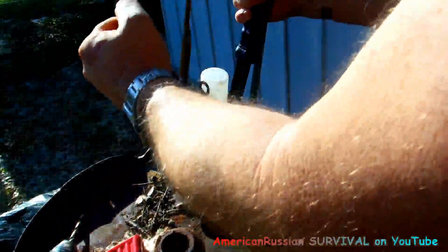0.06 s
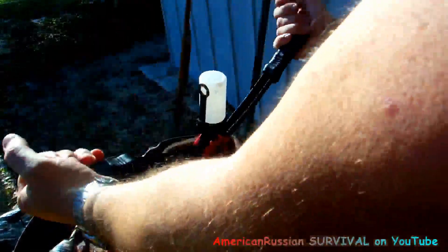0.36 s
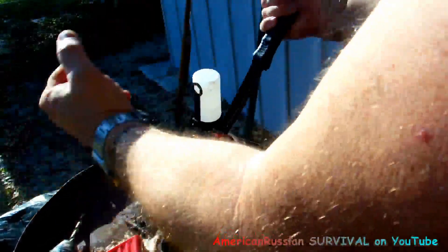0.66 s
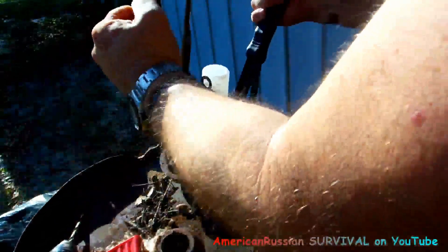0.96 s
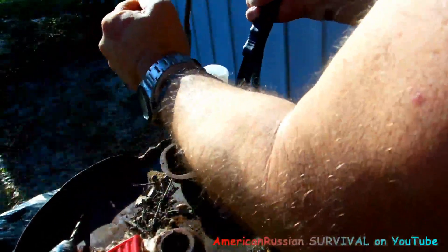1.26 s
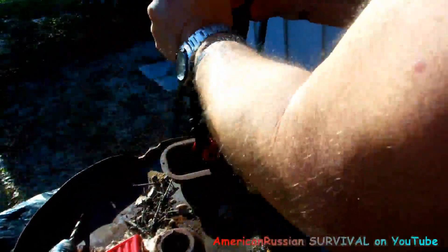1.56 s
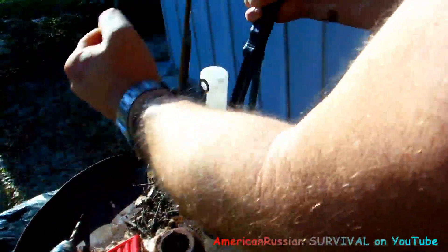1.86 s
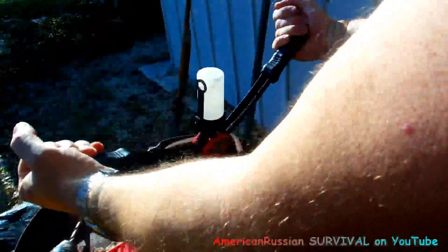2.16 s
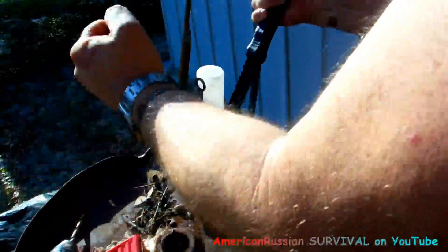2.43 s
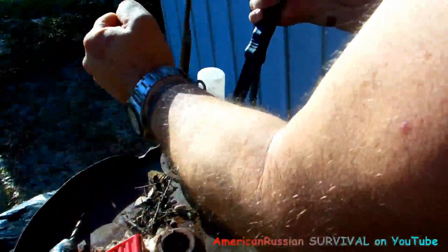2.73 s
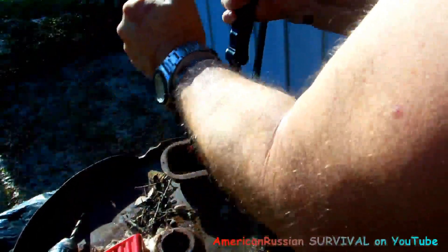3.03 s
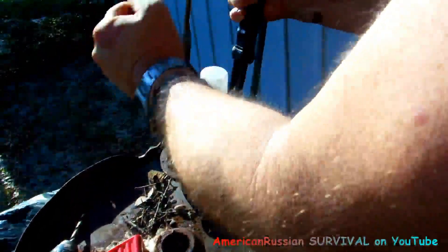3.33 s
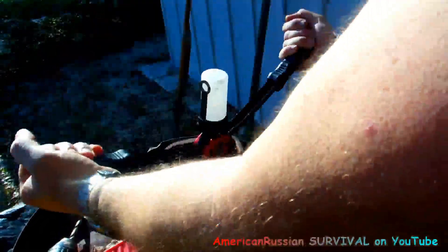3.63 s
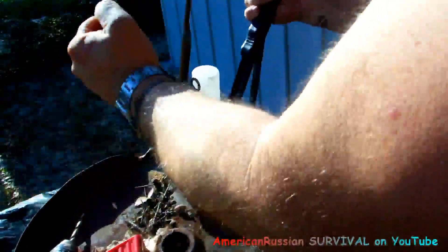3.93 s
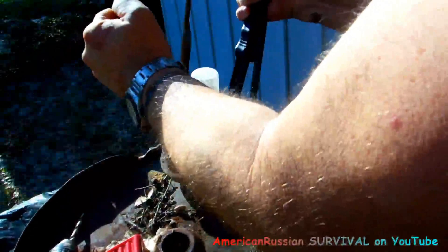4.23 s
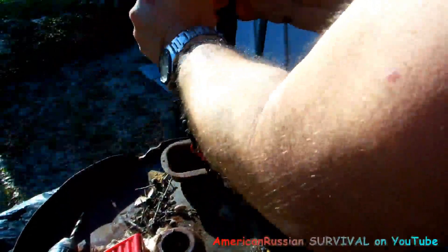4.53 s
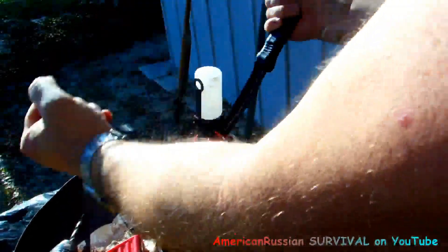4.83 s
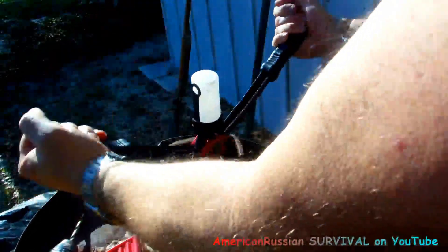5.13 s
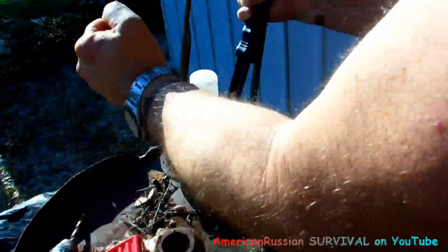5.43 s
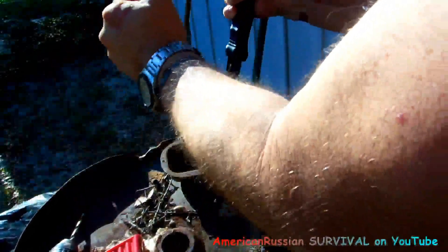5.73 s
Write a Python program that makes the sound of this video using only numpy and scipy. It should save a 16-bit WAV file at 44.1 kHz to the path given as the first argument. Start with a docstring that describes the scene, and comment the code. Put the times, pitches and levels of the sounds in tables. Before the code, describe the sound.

A long-handled steel rivet tool is pumped four times outdoors, close to the microphone and a touch left of centre. Each pull ends in a loud, hard snap, at about 0.4, 2.1, 3.7 and 5.0 seconds, which briefly overloads the microphone and leaves a very short metallic ring. Between the snaps the pivots give quieter, irregular ticks, hollow clacks and dull knocks, and a faint hissing rub swells with each stroke. The jaws chink brightly as the handles turn round, most clearly at 1.7 and 3.3 seconds, more softly at 2.7, 4.1 and 4.7. The metal sounds have a slight, short echo from the yard. Wind buffets the microphone with a low, uneven rumble and soft thumps, leaning to the right, strongest around 3 seconds and easing after 5. A soft, distant outdoor rush lies underneath and sinks toward the end, just before 6 seconds.

```python
"""Steel rivet tool in the wind

A long-handled rivet tool is pumped four times, close by and outdoors. Each pull ends in a snap
that shakes the frame and overloads the microphone; in between the linkage clacks, the jaws chink
and the slide rubs. Wind buffets the two microphone ports over a distant rush."""
import sys
import numpy as np
from scipy import signal
from scipy.fft import rfft, irfft, next_fast_len
from scipy.io import wavfile
from scipy.ndimage import uniform_filter1d, map_coordinates

SR = 44100
rng = np.random.default_rng(int(sys.argv[2]) if len(sys.argv) > 2 else 0)


def transcribe(u):
    """Save the signal u as a 16-bit wav file named by the first command-line argument.

    u: samples, shape (n,) or (channels, n), limited to [-1, 1]; the rate is SR.
    q: integer samples, one column per channel.
    """
    v = np.clip(np.atleast_2d(u).T, -1, 1)
    q = np.round(v * 32767).astype(np.int16)
    wavfile.write(sys.argv[1], SR, q)


N = 254898

# the jaws let go: time_s, crack_db, ring_db, strongest_resonance_hz, lift_db, jolt_lead_s, jolt_db
SNAPS = [(0.3762, -1, -2, 1490, 6.5, 0.0034, -13), (2.109, -3.5, -1, 5240, 3.5, 0.0064, -15),
         (3.655, -3, -3.5, 2160, 10.5, 0.0012, -7), (5.023, -4.5, -4.5, 3800, 6.5, .0027, -15.5)]
# bright tick of steel on steel: freq_hz, level_db
TICK_COLOUR = [(2500, -51), (5000, -7.5), (7200, 1), (8600, -2), (13500, -6.5), (16000, -6.5)]
# hollow clack of the same contact: freq_hz, level_db
CLACK_COLOUR = [(700, -42), (1500, -2.5), (2100, -4.5), (2600, -5), (3400, -1.5), (4400, -7), (6500, -16)]


def amp(db):
    """Decibels to gain."""
    return 10 ** (np.asarray(db) / 20)


def unit(x):
    """Scaled to rms 1."""
    return x / np.sqrt(np.mean(x ** 2) + 1e-20)


def along(points, hz):
    """A (freq_hz, value) curve read on a log frequency axis."""
    freqs, values = np.transpose(points)
    return np.interp(np.log(hz + 1), np.log(freqs + 1), values)


def curves(rows):
    """One value per sample for each column after the time."""
    times, *columns = np.transpose(rows)
    return [np.interp(np.arange(N) / SR, times, column) for column in columns]


def wobble(rate_hz):
    """A smooth random curve through rate_hz knots a second."""
    knots = rng.standard_normal(int(N * rate_hz / SR) + 4)
    return map_coordinates(knots, [np.arange(N) * rate_hz / SR])


def filtered(x, response):
    """x shaped by a gain that depends on frequency."""
    n = x.shape[-1]
    padded = next_fast_len(n + SR // 20)
    return irfft(rfft(x, padded) * response(np.fft.rfftfreq(padded, 1 / SR)), padded)[..., :n]


def noise(gain, size, likeness=None):
    """Stereo noise of rms 1 with a given colour and likeness between the ports."""
    # by default the stereo image widens toward the treble: freq_hz, correlation
    default_likeness = [(400, 1), (2000, 0.93), (4000, 0.57), (13000, 0.23)]

    def mid_side(hz):
        angle = np.arccos(np.clip(along(likeness or default_likeness, hz), -1, 1)) / 2
        return gain(hz) * np.array([np.cos(angle), np.sin(angle)])
    mid, side = filtered(rng.standard_normal((2, size)), mid_side)
    return unit(np.array([mid + side, mid - side]))


def colour(points):
    """Gain as a function of frequency from (freq_hz, level_db) points."""
    return lambda hz: amp(along(points, hz))


def struck(points, ripple_db, step_hz):
    """A colour whose resonances are excited anew, stronger here and weaker there."""
    knots = rng.standard_normal(128)
    ripple = lambda hz: map_coordinates(knots, [hz / step_hz], mode="mirror")
    return lambda hz: amp(along(points, hz) + ripple_db * ripple(hz))


def fade(t, t60_s):
    """Exponential decay, 60 dB in t60_s."""
    return np.exp(-np.log(1000) * t / np.maximum(t60_s, 1e-3))


def rise(t, attack_s):
    """A soft start."""
    return 1 - np.exp(-(t / attack_s) ** 2)


def pan(left_lead_db):
    """Left and right gains of mean power 1."""
    gains = amp(np.array([left_lead_db, -left_lead_db]) / 2)
    return gains / np.sqrt(np.mean(gains ** 2, axis=0))


def add(track, start_s, sound):
    """Mix a sound into the track."""
    part = track[:, max(round(start_s * SR), 0):][:, :sound.shape[-1]]
    part += sound[..., :part.shape[1]]


def snaps():
    """A hard crack as the load lets go, then the frame shudders and rings."""
    # colour of the crack and its shudder: freq_hz, level_db
    crack_colour = [(50, -26), (170, -2.5), (320, -20), (450, -12), (1000, -9.5), (1700, -13),
                    (2650, -13.5), (4000, -12.5), (9500, -13), (12000, -14), (15000, -19)]
    # decay of the shudder: freq_hz, t60_s
    shudder_decay = [(1000, 0.19), (5000, 0.12), (14000, 0.069)]
    out, t = np.zeros((2, N)), np.arange(SR * 2 // 5) / SR
    for start_s, crack_db, ring_db, peak_hz, lift_db, *_ in SNAPS:
        lift = lambda hz: amp(lift_db * np.exp(-(np.log((hz + 1) / peak_hz) / 0.13) ** 2))
        modes = struck(crack_colour, ripple_db=1.3, step_hz=261.0)
        tone = lambda hz: modes(hz) * lift(hz)
        # the first contact is hard and carries little bass
        crack = noise(lambda hz: tone(hz) * hz / (hz + 700), len(t)) * rise(t, 0.0019) * fade(t, 0.038)
        # countless dense modes, the high ones dying first
        band_hz, times, bands = signal.stft(noise(tone, len(t)), SR, nperseg=128)
        bands *= fade(times, along(shudder_decay, band_hz)[:, None])
        shudder = signal.istft(bands, nperseg=128)[1][:, :len(t)] * rise(t, 0.00083)
        add(out, start_s, amp(crack_db) * (amp(9.5) * crack + amp(-0.5) * shudder))
        # the heavy frame takes some milliseconds to swing up
        ring = frame_ring(t, lift, scatter_db=3, spread=0.62) * rise(t, 0.0043)
        add(out, start_s, amp(ring_db + 1) * ring)
    return out


def frame_ring(t, lift, scatter_db, spread):
    """The frame's modes at new strengths and phases; higher ones reach the two ports less alike."""
    # modes of the frame and handles: pitch_hz, level_db, t60_s
    modes = [(246.3, -13, 0.16), (388.5, -3.5, 0.14), (414.4, -2, 0.14), (472.3, -6, 0.14),
             (588.5, -12.5, 0.22), (804, -9.5, 0.19), (864, -26, 0.15), (949, -3.5, 0.067),
             (1564, -5, 0.067), (1835, -7, 0.092), (2430, -13, 0.087), (3470, -13, 0.11), (4770, -20, 0.19),
             (10690, -24, 0.052)]
    hz, level_db, t60_s = np.transpose(modes)[:, :, None]
    strength, skew = rng.standard_normal((2, len(modes), 1))
    start_phase = rng.uniform(0, 2 * np.pi, (len(modes), 1))
    # rattling joints make each mode's phase drift
    drift = 11 * np.cumsum(rng.standard_normal((len(modes), len(t))), axis=1) / np.sqrt(SR)
    phase = 2 * np.pi * hz * t + start_phase + drift
    port_shift = spread * skew * np.sqrt(hz / SR)
    envelope = amp(level_db + scatter_db * strength) * lift(hz) * fade(t, t60_s)
    return np.array([np.sum(envelope * np.sin(phase + side * port_shift), axis=0) for side in (1, -1)])


def linkage():
    """The pivots take up their play along each stroke, and jolt just before each snap."""
    # pivot contacts: start_s, tick_db, clack_db, knock_db, scrape_s
    contacts = [(0.129, -18.5, -25, -33.5, 0.0036), (0.181, -28, -34.5, -39, 0.012),
                (0.702, -36.5, -37, -45, 0), (0.741, -38.5, -37.5, -40.5, 0.016),
                (0.84, -25, -36, -41, 0.0014), (0.867, -27.5, -32.5, -27, 0),
                (0.916, -32, -39, -39, 0.0053), (1.044, -57, -43, -33, 0.0081),
                (1.640, -52, -34.5, -23, 0.0052), (1.654, -21, -23, -39, 0.00029),
                (1.942, -47, -25.5, -30, 0.0017), (2.429, -35, -36, -53, 0.0047),
                (2.445, -42, -34.5, -36.5, 0.017), (2.561, -27, -25.5, -33, 0), (2.583, -26.5, -42, -35, 0),
                (3.249, -33, -30, -31, 0.029), (3.262, -35, -19, -23.5, 0), (3.51, -36, -35.5, -35, 0.018),
                (3.772, -30.5, -31, -32, 0.0042), (3.942, -38, -30, -32, 0.00089),
                (4.058, -28.5, -28, -33.5, 0), (4.591, -29.5, -36.5, -35.5, 0.01),
                (4.612, -19.5, -23, -26.5, 0.00032), (4.881, -43.5, -41.5, -39, 0.023),
                (4.969, -41, -28.5, -33, 0), (5.123, -37.5, -35, -39, 0.0023),
                (5.308, -48, -39, -41.5, 0.018), (5.433, -25, -29.5, -31, 0),
                (5.461, -38, -43.5, -43, 0.016), (5.515, -34.5, -44.5, -52, 0.012)]
    out, t = np.zeros((2, N)), np.arange(SR // 5) / SR
    for start_s, *hit in contacts:
        add(out, start_s, pivot_contact(t, *hit))
    for snap_s, *_, lead_s, jolt_db in SNAPS:
        jolt = pivot_contact(t, tick_db=jolt_db - 3, clack_db=jolt_db, knock_db=jolt_db - 11.5)
        add(out, snap_s - lead_s, jolt * rise(t, 0.00068))
    return out


def pivot_contact(t, tick_db, clack_db, knock_db, scrape_s=0):
    """A pivot hits home: a bright tick, a hollow clack and a slower knock in the handles."""
    # dull body of the handles: freq_hz, level_db
    knock_colour = [(150, -8), (300, -3.5), (480, 2), (700, -7.5), (1500, -9.5), (2800, -27.5)]
    # a scraping contact keeps up an uneven level until it comes free
    free_s = np.maximum(t - scrape_s, 0)
    grit_db = 1.5 * unit(uniform_filter1d(rng.standard_normal(len(t)), size=80)) * (t < scrape_s)
    burst = amp(grit_db) * (fade(free_s, 0.026) + amp(-11) * fade(free_s, 0.085))
    spike = 0.8 * fade(t, 0.0025)
    tick = noise(struck(TICK_COLOUR, ripple_db=2, step_hz=545), len(t)) * (burst + spike)
    clack = noise(struck(CLACK_COLOUR, ripple_db=1, step_hz=339), len(t)) * burst
    knock = noise(colour(knock_colour), len(t)) * rise(t, 0.0007) * fade(free_s, 0.17)
    return amp(tick_db + 2.5) * tick + amp(clack_db + 4) * clack + amp(knock_db + 3.5) * knock


def jaws():
    """Small hard parts skid for a few milliseconds and ring high: a touch, the chink, a rebound."""
    # the jaws and their spring chink as the handles turn round: time_s, level_db
    chinks = [(1.6874, -8), (2.657, -15.5), (3.301, -4.5), (4.146, -13.5), (4.661, -15.5), (5.595, -30)]
    # resonances of the jaws: pitch_hz, width_hz, level_db
    resonances = [(6450, 3000, -6.5), (7320, 290, 5.5), (9700, 1500, -2.5), (11400, 500, 2),
                  (12700, 1500, 1.5)]
    skid_s, skid_db = 0.0102, -8
    out, t = np.zeros((2, N)), np.arange(SR // 10) / SR

    def steel(hz):
        return abs(sum((-1) ** k * amp(db) * 1j * hz * width / (pitch ** 2 - hz ** 2 + 1j * hz * width)
                       for k, (pitch, width, db) in enumerate(resonances)))
    for time_s, level_db in chinks:
        for step in (-1, 0, 1):
            chink = noise(steel, len(t)) * rise(t, 0.0013) * fade(t, 0.027)
            add(out, time_s + step * skid_s, amp(level_db + abs(step) * skid_db) * chink)
    return out


def slide_speed(offset_s, width_s):
    """A swell from 0 to 1 and back in every stroke, centred offset_s after its snap."""
    t = np.arange(N) / SR
    return sum(np.exp(-((t - snap_s - offset_s) / width_s) ** 2) for snap_s, *_ in SNAPS)


def slide_rub():
    """A fine hiss with a faint whistle, swelling and catching as the slide rubs to and fro."""
    # hiss with a narrow whistling peak: freq_hz, level_db
    hiss_colour = [(2000, 9), (3500, 1.5), (5500, -1), (7250, -1), (7500, 2), (7750, -3.5), (10000, -0.5),
                   (14000, 0)]
    rest_db, stroke_db, catches_per_s = -45.5, -42.5, 49
    motion = slide_speed(offset_s=-0.15, width_s=0.256) + slide_speed(offset_s=0.49, width_s=0.12)
    rub = np.sqrt(amp(rest_db) ** 2 + motion * amp(stroke_db) ** 2)
    hiss = amp(wobble(230)) * noise(colour(hiss_colour), N)
    # the surfaces catch only while the slide moves, each catch dying within milliseconds
    impulses = (rng.random(N) < catches_per_s * motion / SR) * rng.random(N) ** 2
    envelope = signal.fftconvolve(impulses, fade(np.arange(SR // 20) / SR, 0.013))[:N]
    catches = envelope * noise(lambda hz: colour(TICK_COLOUR)(hz) + colour(CLACK_COLOUR)(hz), N)
    return rub * (hiss + amp(12.5) * catches)


def yard_echo(x):
    """A short answer from the ground and a nearby wall."""
    t = np.arange(SR // 3) / SR
    tail = rng.standard_normal((2, len(t))) * rise(t, 0.00075) * fade(t, 0.3)
    return signal.fftconvolve(x, tail / np.linalg.norm(tail[0]), axes=1)[:, :N]


def wind():
    """Buffeting on the ports; fast eddies arrive as single short thumps that reach higher."""
    # the gusts: time_s, buffet_db, eddy_db
    gusts = [(0.0, -27, -41), (0.17, -28.5, -34.5), (0.3, -17.5, -29.5), (0.55, -19.5, -32),
             (1.3, -20.5, -33), (1.95, -22, -35), (2.35, -31, -57), (2.6, -22.5, -35.5), (2.95, -13.5, -22),
             (3.2, -20.5, -26.5), (3.6, -17.5, -27.5), (3.8, -17.5, -35.5), (4.05, -23.5, -30),
             (4.3, -24, -75), (4.5, -23, -43.5), (4.75, -29.5, -52), (5.1, -36.5, -49), (5.78, -36, -48.5)]
    # deep buffeting: freq_hz, level_db
    rumble_colour = [(8, -29), (20, 1), (50, -2.5), (120, -9.5), (200, -32.5), (500, -75)]
    # fast eddies: freq_hz, level_db
    eddy_colour = [(50, -5), (130, 3.5), (200, 1), (330, -10), (600, -26), (1500, -50.5)]
    buffet_db, eddy_db = curves(gusts)
    rumble = amp(buffet_db) * noise(colour(rumble_colour), N, likeness=[(50, 0.44)])
    rumble *= unit(amp(wobble(14)))
    # each thump lasts about one cycle and is felt a little differently at each port
    thumps = unit(amp(4.2 * wobble(75) + 2 * np.array([wobble(75), wobble(75)])))
    eddies = amp(eddy_db + 3.5) * noise(colour(eddy_colour), N, likeness=[(150, 0.81)]) * thumps
    # gusts lean to the windward right port, small fast eddies more so than big slow ones
    calm_db = -31
    lean_db = -0.96 * np.maximum(buffet_db - calm_db, 0)
    return pan(0.76 * lean_db) * rumble + pan(lean_db) * eddies


def distant_rush():
    """A soft, far-off outdoor rush that wavers and slowly sinks."""
    # its fade: time_s, level_db
    levels = [(0, -34), (0.5, -38), (4.6, -39), (5.78, -45.5)]
    # its muted colour: freq_hz, level_db
    rush_colour = [(150, 0.5), (400, -1), (620, -2), (950, 1.5), (1500, -3), (2500, -13.5), (4000, -23),
                   (8000, -38)]
    level_db, = curves(levels)
    return amp(level_db + 1.2 * wobble(18)) * noise(colour(rush_colour), N, likeness=[(1000, 0.82)])


def scene():
    """The tool close by, a touch left of centre, in the yard and the wind."""
    small_parts = linkage() + jaws()
    tool = (snaps() + small_parts) * amp([[0.5], [-0.5]])
    echoes = amp(-16.5) * yard_echo(small_parts) + amp(-21) * yard_echo(tool)
    return tool + echoes + wind() + distant_rush() + slide_rub()


def record(dry):
    """The microphone cuts the top treble and overloads on the snaps; a second cut trims the fizz."""
    steep_lowpass = lambda top_hz: lambda hz: 1 / np.sqrt(1 + (hz / top_hz) ** 200)
    narrow = filtered(dry, steep_lowpass(top_hz=14150))
    clipped = narrow / (1 + np.abs(narrow) ** 8) ** (1 / 8)
    return filtered(clipped, steep_lowpass(top_hz=15700))


dry = scene()
out = record(dry)
transcribe(out)
```